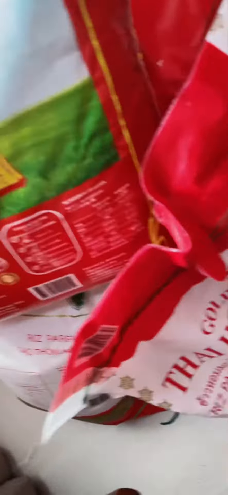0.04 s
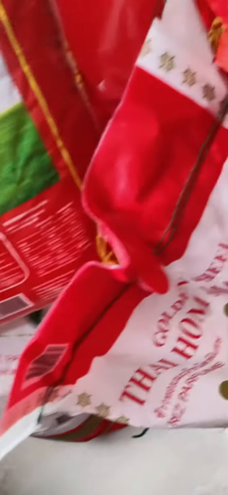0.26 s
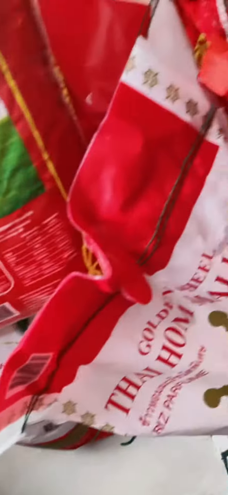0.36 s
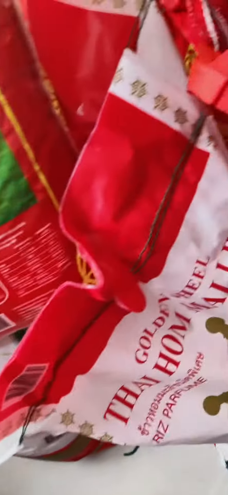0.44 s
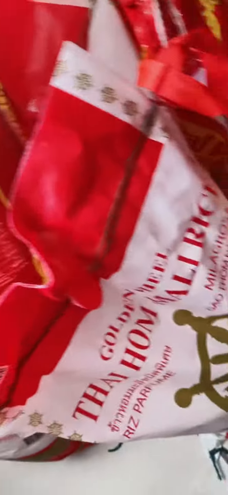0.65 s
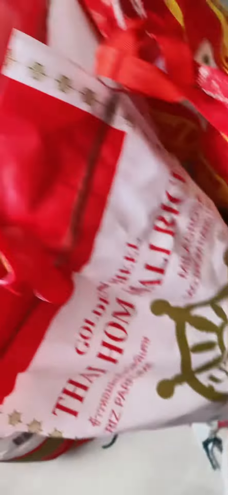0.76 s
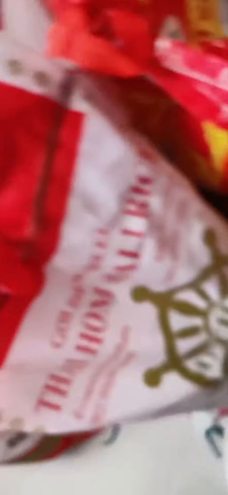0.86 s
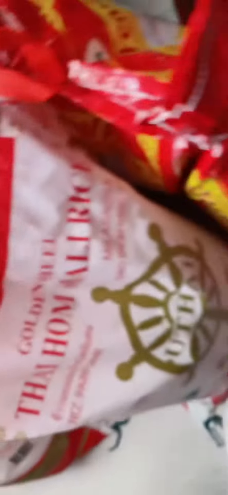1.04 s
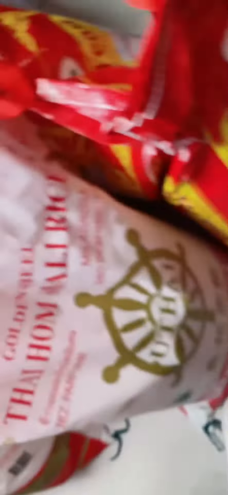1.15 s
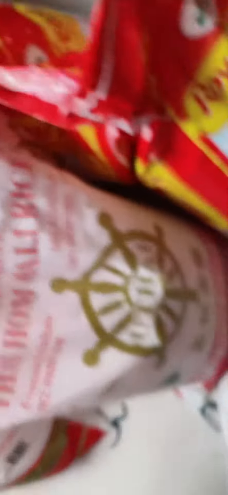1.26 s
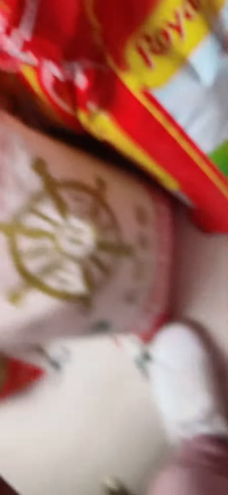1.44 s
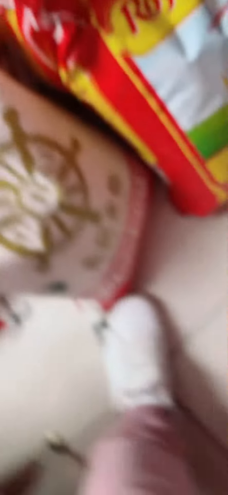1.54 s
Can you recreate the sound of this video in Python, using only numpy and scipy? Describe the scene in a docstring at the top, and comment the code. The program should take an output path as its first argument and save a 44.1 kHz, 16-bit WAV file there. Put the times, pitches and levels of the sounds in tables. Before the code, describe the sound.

A plastic sack of rice crinkles, snaps, then crumples loudly with dull thuds and a hiss of shifting grains. A shoe then slaps and scuffs the hard floor in a small room, over low hum and microphone handling rumble.

```python
"""A plastic sack of rice is bumped: its film crinkles, snaps, then crumples loudly as creases buckle.
The shifting load drums on the sack wall and lands with dull thuds; grains hiss along the film and settle.
A shoe slaps the hard floor and scuffs on, followed by a few soft knocks and a heel thud.
A small room echoes it all, over a low hum of room noise and handling rumble."""
import sys
import numpy as np
from scipy import signal
from scipy.fft import rfft, irfft
from scipy.io import wavfile
from scipy.ndimage import uniform_filter1d

SR = 44100
rng = np.random.default_rng(int(sys.argv[2]) if len(sys.argv) > 2 else 0)


def generate_wav(signal):
    """Clip the signal to [-1, 1] and save it as 16-bit WAV at the path in sys.argv[1]."""
    frames = np.transpose(np.atleast_2d(signal))
    scaled = np.clip(frames, -1, 1) * 32767
    pcm = np.round(scaled).astype(np.int16)
    wavfile.write(sys.argv[1], SR, pcm)


N = 70560
T = np.arange(N) / SR

# how hard the film is creased: time_s, level_db
CREASE_LEVEL = [(0, -35), (.05, -41.5), (.09, -47), (.16, -58.5), (.228, -58.5), (.25, -28.5),
                (.275, -42.5), (.305, -39.5), (.365, -55.5), (.382, -29.5), (.40, -30.5), (.422, -16),
                (.44, -20.5), (.452, -19), (.468, -26.5), (.482, -19), (.52, -27), (.57, -31.5),
                (.62, -46.5), (.67, -43.5), (.73, -50.5), (.75, -38), (.80, -38), (.83, -52), (.90, -60.5),
                (.94, -51), (1.0, -79), (1.1, -69), (1.6, -61.5)]
# single creases popping through: start_s, level_db
CREASE_POPS = [(0.0348, -41), (0.0529, -30), (0.08, -29.5), (0.1194, -33), (0.143, -38.5), (.4, -27),
               (0.4098, -16), (0.4188, -8), (0.4236, -14.5), (0.4267, -12), (0.4379, -16), (0.4835, -29),
               (0.4974, -15.5), (0.514, -18), (.932, -46)]
# tone of the film: freq_hz, gain_db
FILM_TONE = [(150, -11), (500, -9), (1000, 1), (1700, 2), (2500, -1.5), (3600, -1.5), (4600, -6),
             (5400, -12), (7000, -10.5), (10000, -18.5), (15500, -35)]

def film():
    """Tiny creases buckle in a dense stream, each a short crackle; larger ones pop singly."""
    crease_t60_s, pop_t60_s = 0.0048, 0.011
    buckles = clicks(per_s=2000, spread_db=3)
    decay = np.exp(-2 * np.log(1000) / (crease_t60_s * SR))
    energy = signal.lfilter([1 - decay], [1, -decay], buckles ** 2)
    crackle = np.sqrt(energy) * noise() + 0.95 * buckles
    pops = sum(from_db(db) * crack(s, pop_t60_s) for s, db in CREASE_POPS)
    return coloured(evened(crackle, samples=700) * level(CREASE_LEVEL) + pops, FILM_TONE)


# how hard the load pushes on the sack wall: time_s, level_db
LOAD_PUSH = [(0, -50.5), (.225, -65), (.242, -34), (.266, -31), (.28, -40), (.365, -61), (.385, -20),
             (.402, -27.5), (.42, -14.5), (.455, -16.5), (.485, -16), (.51, -19), (.545, -32), (.58, -60),
             (.735, -55), (.752, -35), (.786, -39), (.83, -49.5), (.95, -84), (1.6, -97)]
# body of the loaded sack: freq_hz, gain_db
LOAD_TONE = [(25, -26), (60, -6), (110, -1), (165, -7.5), (250, -0.5), (330, -5), (480, 1), (700, -2),
             (1100, -10.5), (2000, -26.5), (5000, -28.5)]
# resonances of the sack wall: pitch_hz, width_hz, gain_db
WALL_MODES = [(110, 21, -1.5), (252, 74, 0.5), (430, 14, 1.5), (482.5, 32, -7.5), (632, 71, -3.5),
              (1020, 35, -9)]

def load():
    """The rice shifts in small jolts that drum on the resonant sack wall."""
    jolts = coloured(clicks(per_s=900, spread_db=2.5), LOAD_TONE)
    ringing = sum(from_db(db) * signal.lfilter(*signal.iirpeak(hz, hz / width, fs=SR), jolts)
                  for hz, width, db in WALL_MODES)
    return evened(jolts + ringing, samples=800) * level(LOAD_PUSH)


# runs of sliding grain: peak_s, level_db, rise_s, t60_s
GRAIN_SLIDES = [(0.306, -42.5, 0.034, 0.095), (0.536, -22.5, 0.015, 0.17), (.625, -40.5, 0.011, 0.052),
                (.797, -45, 0.011, 0.05)]
# tone of the grain hiss: freq_hz, gain_db
SLIDE_TONE = [(800, -18), (2800, -4), (3900, 4.5), (5200, -7.5), (7000, -13), (9500, -12.5), (12000, -29),
              (16000, -27)]

def slides():
    """Grains hiss along the film after each shove."""
    swells = sum(from_db(db) * burst(s, rise, t60) for s, db, rise, t60 in GRAIN_SLIDES)
    return coloured(noise() * swells, SLIDE_TONE)


# sack snaps and, last, a bright scuffing brush: start_s, level_db, t60_s, treble_db
SNAPS_AND_BRUSH = [(.234, -19, 0.024, -0.5), (.342, -44, 0.009, 9), (0.4022, -22, 0.014, -2),
                   (0.464, -25, 0.0089, -7), (.654, -40, .06, -1), (.691, -41.5, 0.014, -2),
                   (0.725, -49.5, 0.081, 6), (0.743, -34.5, 0.031, -8), (0.965, -50, 0.0096, 0),
                   (1.132, -53, 0.07, -3), (1.158, -64.5, 0.27, 11)]
# bright tone of the snaps and brush: freq_hz, gain_db
SNAP_TONE = [(60, -32), (250, -10), (500, -9), (1200, -9), (3300, 1.5), (5000, -12.5), (6800, 0),
             (8000, -2), (9200, 0), (10400, -9.5), (11700, -2.5), (13500, -10), (16000, -16)]

def snaps_and_brush():
    """Sharp snaps of the sack, and a faint bright scuffing brush just before the shoe slaps."""
    highpass = signal.butter(2, 11800, "high", fs=SR, output="sos")
    out = 0
    for s, db, t60, treble_db in SNAPS_AND_BRUSH:
        body = crack(s, t60)
        sizzle = unit_rms(signal.sosfilt(highpass, noise())) * burst(s, rise_s=0.0001, t60_s=t60)
        out += from_db(db) * (body + from_db(treble_db) * sizzle)
    return coloured(out, SNAP_TONE)


# sack or heel landing: start_s, level_db, pitch_hz, t60_s
LANDINGS = [(.242, -24.5, 119.7, 0.22), (.24, -27, 252.7, 0.18), (0.433, -26, 112.6, 0.21),
            (0.482, -19, 89.8, 0.2), (.595, -38, 42.2, 0.25), (0.614, -36.5, 223, 0.13),
            (0.788, -38.5, 118.5, 0.34), (1.131, -37, 340, 0.062), (1.224, -34, 79, .22),
            (1.355, -35, 263, 0.1), (1.371, -19, 91, 0.1)]

def thuds():
    """Low booms where the weight of sack or heel lands."""
    return sum(from_db(db) * ring(s, hz, t60, rise_s=0.0017) for s, db, hz, t60 in LANDINGS)


# soft knocks of sack and shoe: start_s, level_db, centre_hz
KNOCK_HITS = [(.144, -40.5, 1500), (.155, -46, 1300), (.254, -24.5, 1490), (.615, -38, 260),
              (.682, -30, 480), (.781, -33, 403), (1.132, -40, 450), (1.305, -31.5, 820),
              (1.355, -35.5, 664), (1.573, -45.5, 1050)]
# tone of the contact rasp: freq_hz, gain_db
RASP_TONE = [(120, -18), (270, -1.5), (600, -3.5), (1500, -9.5), (3000, -16.5), (10000, -39)]
# resonances a knock excites: pitch_hz, gain_db, t60_s
KNOCK_RINGS = [(284, 1.5, 0.064), (391, -2.5, 0.055), (513, -3.5, 0.033), (760, -3, 0.047), (980, 0, 0.043),
               (1176, -5.5, 0.032), (1497, -3.5, 0.032)]

def knocks():
    """Padded contacts: each rasps a little and favours the modes near its centre frequency."""
    rasp_db, rolloff_db_per_octave, scatter_db = -8.5, 5, 3
    rasp = sum(from_db(db + rasp_db) * burst(s, rise_s=0.00089, t60_s=0.1) for s, db, _ in KNOCK_HITS)
    out = coloured(noise() * rasp, RASP_TONE)
    for s, db, centre_hz in KNOCK_HITS:
        for k, (hz, mode_db, t60) in enumerate(KNOCK_RINGS):
            rolloff_db = rolloff_db_per_octave * abs(np.log2(hz / centre_hz))
            strength_db = db + mode_db - rolloff_db + scatter_db * rng.standard_normal()
            out += (-1) ** k * from_db(strength_db) * ring(s, hz, t60)
    return out


# tone of the slap: freq_hz, gain_db
SLAP_TONE = [(100, -19), (240, 4.5), (400, -7.5), (580, -16), (780, -1), (1000, -0.5), (1400, 1),
             (2500, -5.5), (4000, -9.5), (6000, -13), (9500, -15.5), (16000, -34)]
# hollow ring of the sole: pitch_hz, level_db, t60_s
SOLE_RINGS = [(272, -27, 0.07), (729, -25.5, 0.072), (1180, -29, .035), (1367, -13, 0.027),
              (1860, -29, .035), (2650, -28, 0.031)]
# how hard the sole scuffs: time_s, level_db
SCUFF_LEVEL = [(1.11, -86), (1.14, -56), (1.192, -58.5), (1.21, -34.5), (1.25, -40.5), (1.285, -46),
               (1.315, -49), (1.335, -61), (1.42, -68), (1.48, -57.5), (1.56, -64), (1.6, -54.5)]
# tone of the scuff: freq_hz, gain_db
SCUFF_TONE = [(150, -6.5), (500, 6.5), (850, 1), (1300, -5.5), (2500, -4), (5000, -8.5), (10000, -13.5),
              (16000, -15)]

def shoe():
    """A sole slaps the floor with a hollow ring and scuffs on."""
    slap_s, slap_db = 1.1995, -25.5
    impact = from_db(slap_db) * burst(slap_s, rise_s=0.0014, t60_s=0.1)
    slap = coloured(evened(noise(), samples=60) * impact, SLAP_TONE)
    hollow = sum(from_db(db) * ring(slap_s, hz, t60, rise_s=0.0013) for hz, db, t60 in SOLE_RINGS)
    scuff = coloured(noise(), SCUFF_TONE) * level(SCUFF_LEVEL)
    return slap + hollow + scuff


# the small room's reverb: freq_hz, level_db, t60_s
REVERB_BANDS = [(60, -12.5, .7), (120, -20.5, .7), (250, -20.5, 0.61), (496, -18.5, 0.43), (990, -10, 0.46),
                (3500, -12, 0.48), (7960, -25.5, 0.42), (16000, -10, 0.25)]

def room(x):
    """Reflections build quickly into a diffuse tail that dies band by band."""
    build_s, tail = 0.0088, 0
    edges_hz = np.geomspace(40, 18000, 10)
    for low, high in zip(edges_hz, edges_hz[1:]):
        db, t60 = at_hz(REVERB_BANDS, np.sqrt(low * high))
        envelope = fade(T, t60) * (1 - np.exp(-T / build_s))
        band = signal.sosfilt(signal.butter(2, [low, high], "band", fs=SR, output="sos"), noise())
        tail += from_db(db) * band * envelope / np.linalg.norm(envelope)
    return signal.fftconvolve(x, tail)[:N]


# steady room tone: freq_hz, gain_db
ROOM_TONE = [(22, -9), (32, -6), (60, 6), (85, 0), (120, 4), (165, -8), (230, -5), (330, -8.5), (600, -8.5),
             (1200, -12), (2500, -19.5), (5000, -26), (10000, -32), (16000, -31)]
# tone of the handling rumble: freq_hz, gain_db
RUMBLE_TONE = [(20, -13), (35, -8), (65, 2), (85, -4), (120, 1.5), (160, -10.5), (400, -18), (2000, -52)]
# swells of the handling rumble: time_s, level_db
RUMBLE_LEVEL = [(0, -46), (.15, -49), (.33, -45), (.56, -56), (.66, -49), (.86, -46), (.95, -83),
                (1.1, -58), (1.18, -47), (1.3, -47.5), (1.48, -49.5), (1.6, -54.5)]

def background():
    """A bed of low room noise, with handling rumble that comes and goes."""
    room_tone = from_db(-54) * coloured(noise(), ROOM_TONE)
    rumble = evened(coloured(noise(), RUMBLE_TONE), samples=2500) * level(RUMBLE_LEVEL)
    return room_tone + rumble


def from_db(db):
    """Decibels to gain."""
    return 10 ** (np.asarray(db) / 20)


def unit_rms(x):
    """Scale to unit rms."""
    return x / np.sqrt(np.mean(x ** 2) + 1e-20)


def level(rows):
    """A fader curve of time_s, level_db as a gain per sample."""
    return from_db(np.interp(T, *np.transpose(rows)))


def at_hz(rows, hz):
    """Read each column of a table on a log-frequency axis."""
    freqs, *columns = np.transpose(rows)
    return [np.interp(np.log(hz + 1e-9), np.log(freqs), column) for column in columns]


def coloured(x, tone):
    """Minimum-phase EQ shaped like the tone table; keeps the power of white noise."""
    size = 2 * N
    gain_db = at_hz(tone, np.arange(N + 1) * SR / size)[0]
    cepstrum = irfft(np.log(unit_rms(from_db(gain_db))))
    cepstrum[1:N] *= 2  # fold onto positive time, so nothing rings ahead of a hit
    cepstrum[N + 1:] = 0
    return irfft(rfft(x, size) * np.exp(rfft(cepstrum)))[:N]


def evened(x, samples):
    """Hold the running rms at one."""
    power = uniform_filter1d(uniform_filter1d(x * x, samples), samples)
    return x / np.sqrt(np.abs(power) + 1e-12)


def noise():
    """White noise."""
    return rng.standard_normal(N)


def fade(age_s, t60_s):
    """Full level until age zero, then 60 dB down every t60_s."""
    return np.exp(-np.log(1000) * np.maximum(age_s, 0) / t60_s)


def burst(peak_s, rise_s, t60_s):
    """Envelope that swells to a peak and dies away."""
    return np.exp(np.minimum(T - peak_s, 0) / rise_s) * fade(T - peak_s, t60_s)


def crack(start_s, t60_s):
    """Noise that starts at once and dies away."""
    return noise() * (T >= start_s) * fade(T - start_s, t60_s)


def ring(start_s, hz, t60_s, rise_s=1e-5):
    """A struck mode; a soft contact rounds its attack."""
    age = np.maximum(T - start_s, 0)
    attack = 1 - np.exp(-age / rise_s)
    return np.sin(2 * np.pi * hz * age) * attack * fade(age, t60_s) * (age < 2 * t60_s)


def clicks(per_s, spread_db):
    """Random clicks, mostly small, a few large."""
    hits = rng.random(N) < per_s / SR
    sizes = from_db(spread_db * np.minimum(rng.exponential(1, N), 4.5))
    return hits * sizes * rng.choice([-1, 1], N)


def scene():
    """Sack and shoe over the background; the step sends less to the reverb than the sack."""
    sack = film() + load() + slides() + snaps_and_brush() + knocks() + thuds()
    step, step_send_db = shoe(), -4
    reverb = room(sack + from_db(step_send_db) * step)
    return (sack + step + reverb + background())[None]


def record(dry):
    """Soft saturation rounds the peaks and a steep low-pass cuts the very top."""
    lowpass = signal.ellip(10, 0.2, 80, 15800, fs=SR, output="sos")
    return signal.sosfilt(lowpass, np.tanh(dry))


dry = scene()
out = record(dry)
generate_wav(out)
```